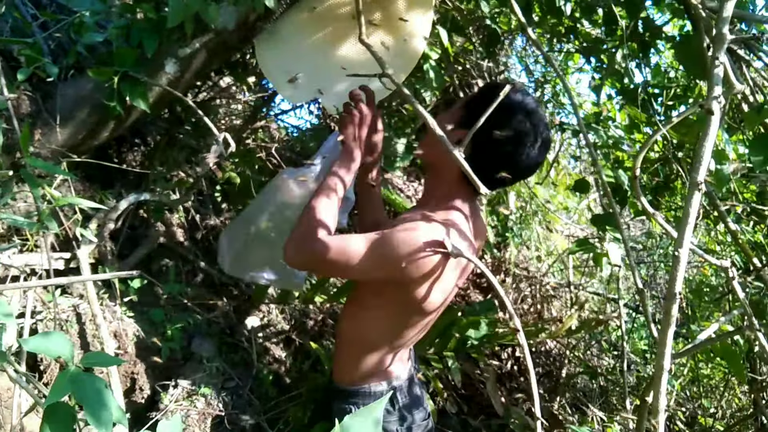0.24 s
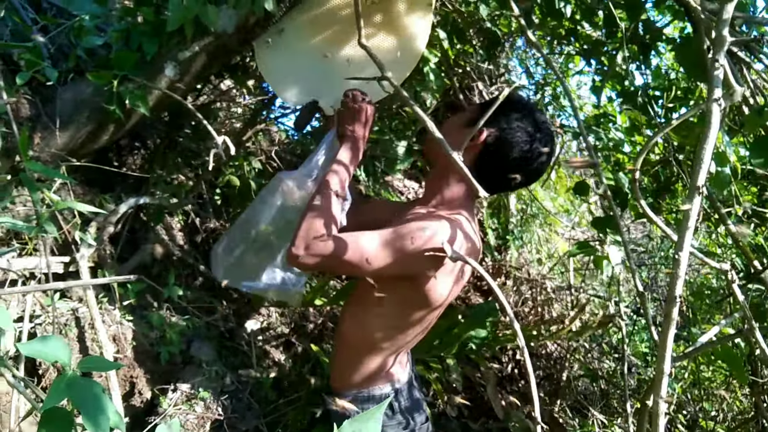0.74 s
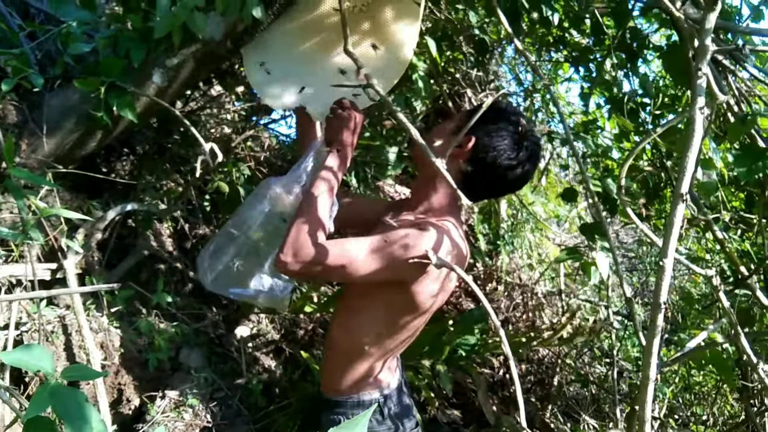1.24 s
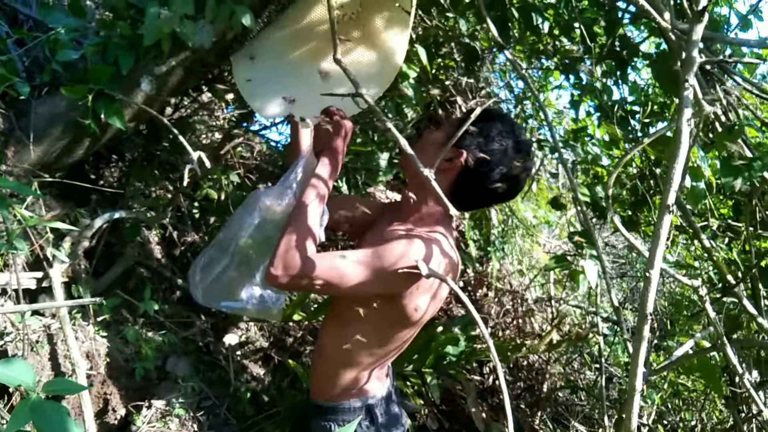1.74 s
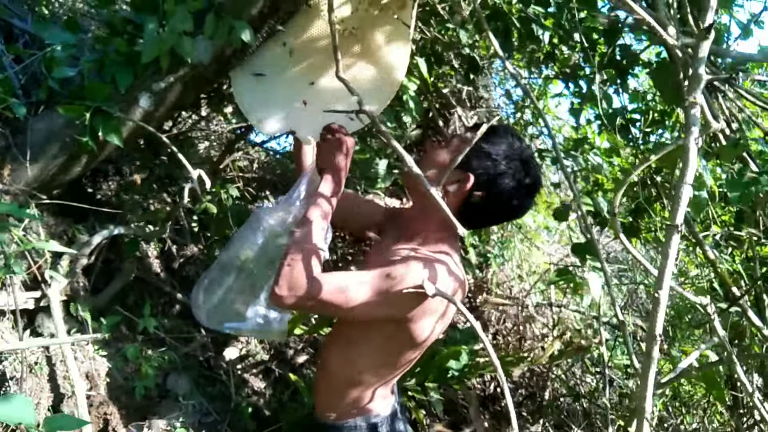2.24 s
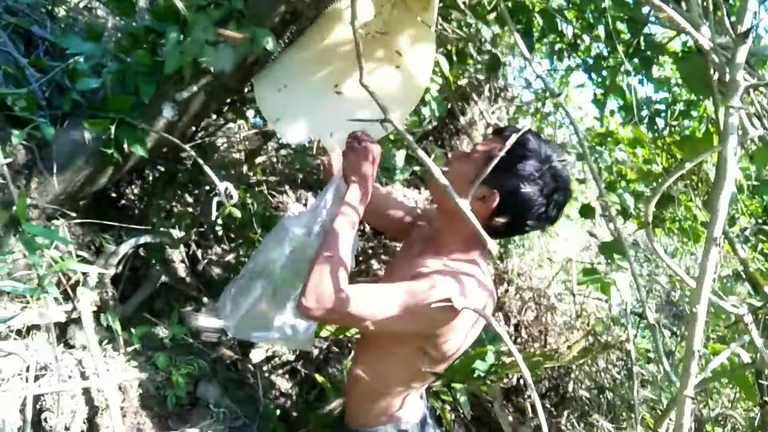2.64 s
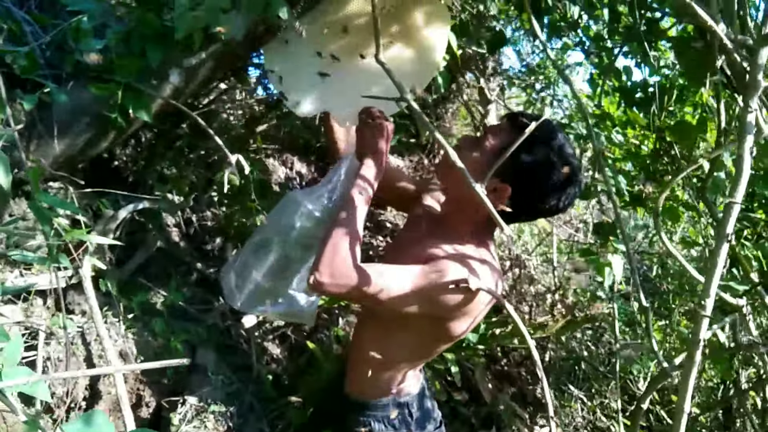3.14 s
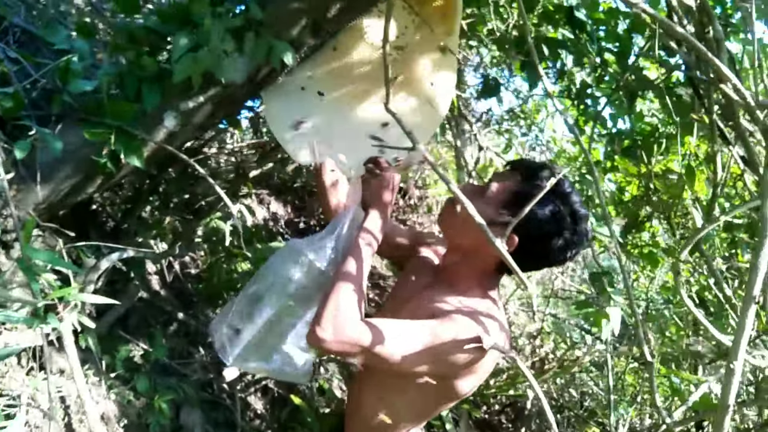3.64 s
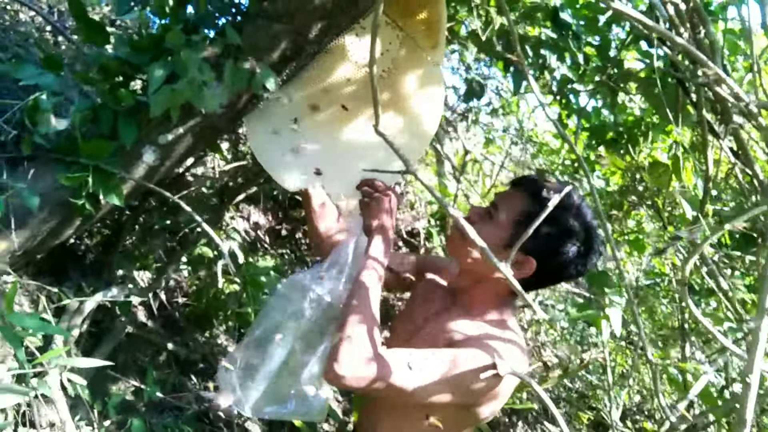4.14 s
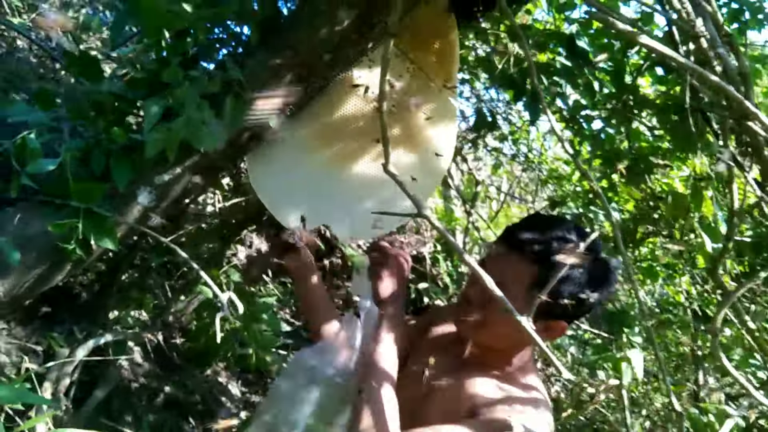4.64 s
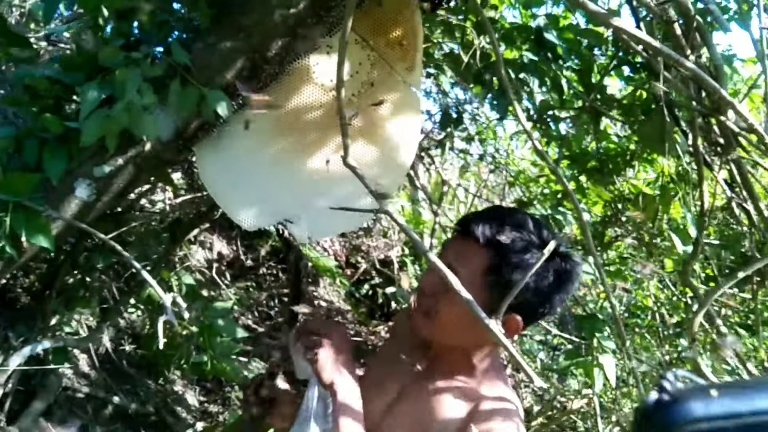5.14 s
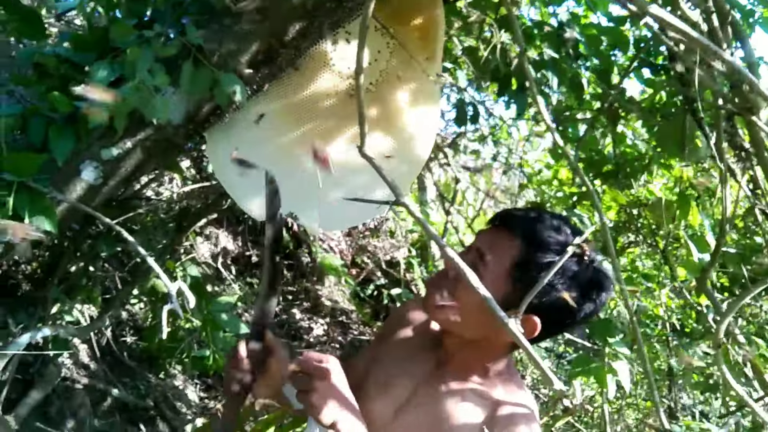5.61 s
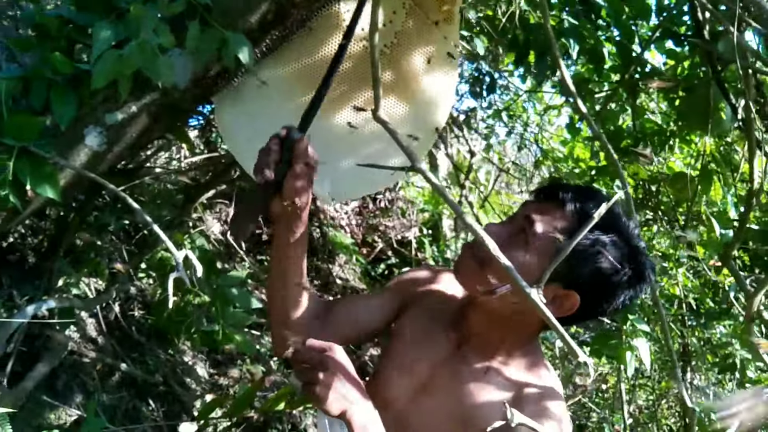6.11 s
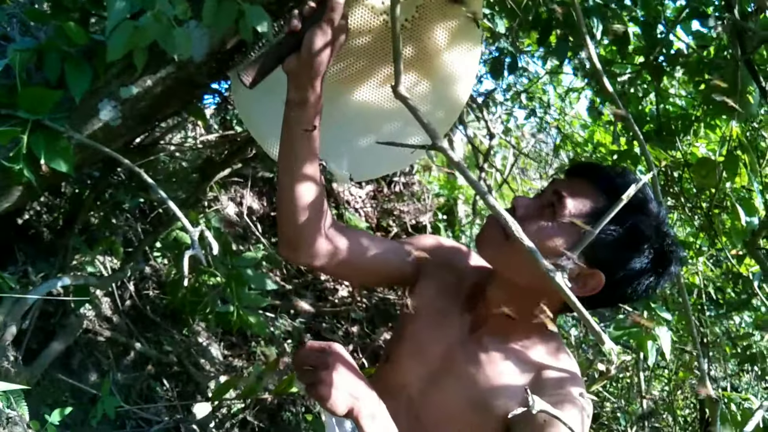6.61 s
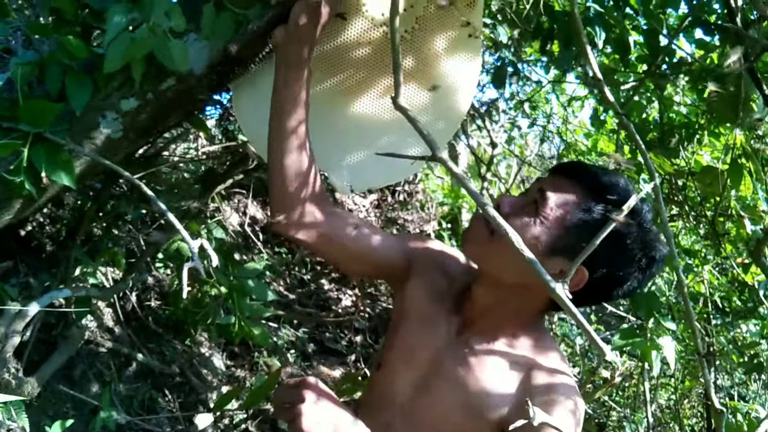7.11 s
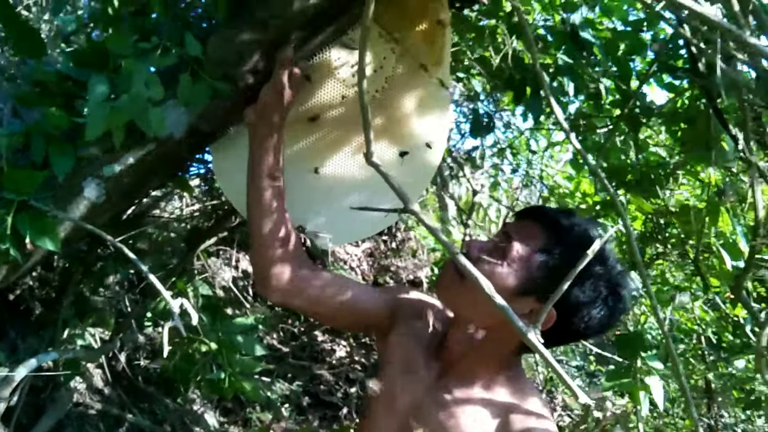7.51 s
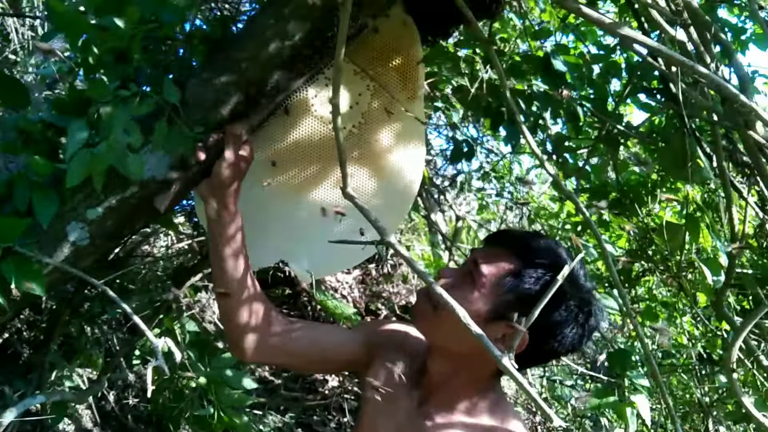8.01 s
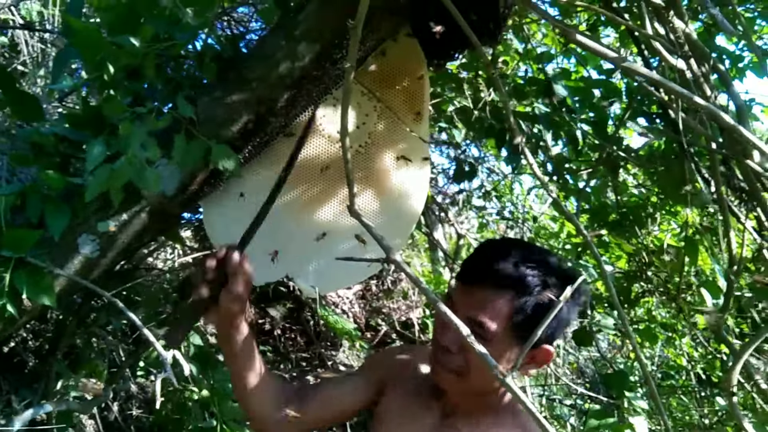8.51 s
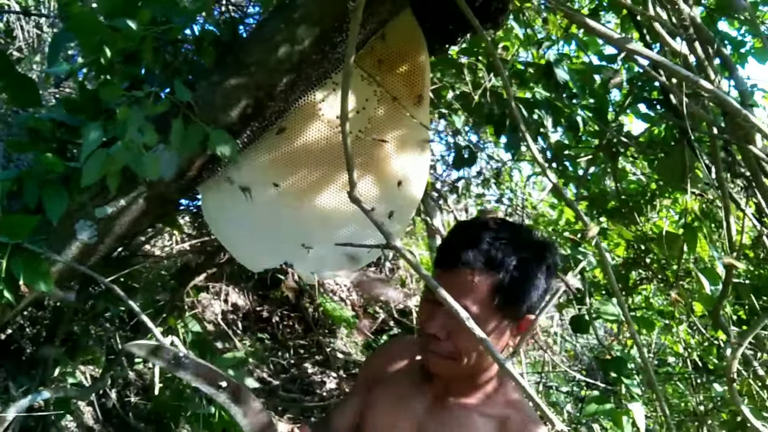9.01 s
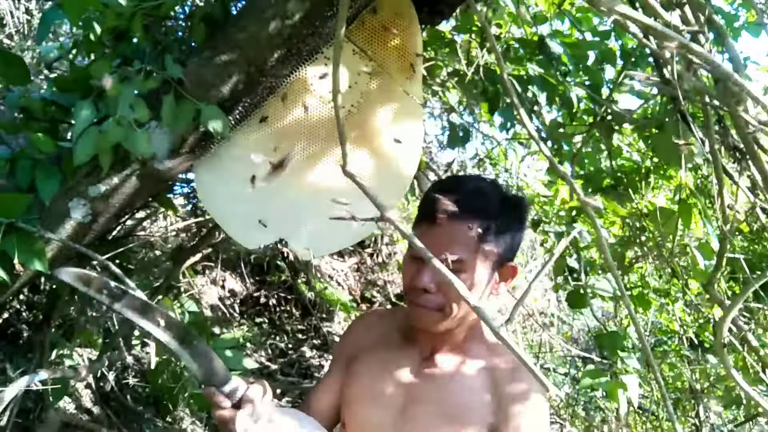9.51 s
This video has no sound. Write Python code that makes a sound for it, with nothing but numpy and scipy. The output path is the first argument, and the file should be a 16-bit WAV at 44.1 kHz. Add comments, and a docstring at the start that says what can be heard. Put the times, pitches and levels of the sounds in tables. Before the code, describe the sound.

A swarm of wild bees drones steadily outdoors, a plastic bag crinkles and snaps midway, then one bee zooms past the microphone amid crunching leaves.

```python
"""A cloud of wild bees drones around a comb under a tree, swelling as it is disturbed; single bees swing nearer.
The bees are looped wing strokes and summed harmonics; short treble buzzes and stirring leaves are resonated noise.
A plastic bag crinkles and snaps: clumps of ringing clicks, and short bursts of noise.
Near the end one bee shoots past the microphone: sweeping harmonics, wing wash thumping on the port,
and dry leaves crunch, built like the bag."""
import sys
import numpy as np
from scipy import signal
from scipy.fft import rfft, irfft, next_fast_len
from scipy.io import wavfile
from scipy.ndimage import uniform_filter1d, map_coordinates

SR = 44100
rng = np.random.default_rng(int(sys.argv[2]) if len(sys.argv) > 2 else 0)


def persist_wave(psi):
    """Save psi, clipped to +-1, as 16-bit WAV."""
    counts = np.round(np.clip(psi, -1, 1) * 32767).astype(np.int16)
    wavfile.write(sys.argv[1], SR, np.atleast_2d(counts).T)


N = 430416
TIME = np.arange(N) / SR
CUTOFF_HZ = 15650

# swarm before and after the close bee: (time [s], nominal hum level [dB], nominal wing rasp level [dB])
SWARM = [(0.0, -38.5, -53), (0.2, -42, -49), (0.79, -47, -57), (1.07, -39.5, -50), (1.42, -42.5, -46.5),
         (1.57, -41, -54.5), (2.22, -42, -52), (2.27, -46, -44), (2.42, -41, -45), (2.62, -43, -47.5),
         (3.1, -41, -47), (3.95, -39.5, -44), (4.44, -38.5, -42.5), (5.21, -41.5, -43), (6.01, -35, -40),
         (6.38, -40.5, -41), (8.67, -40.5, -46), (8.95, -38.5, -45.5)]
SWARM_SETTLING = [(9.3, -41.5, -43), (9.606, -41.5, -44.5), (9.76, -51, -45.5)]
# brief dips of the hum: (time [s], depth in nominal hum level [dB])
LULLS = [(0.45, 8), (0.86, 3), (1.49, 8), (2.34, 5), (2.72, 7), (2.98, 6), (6.48, 7), (6.73, 1), (7.27, 4),
         (7.62, 5), (7.96, 4), (8.55, 2)]
LULL_HALF_S = 0.034
# body tone of the wingbeat, and rasp of its upper harmonics: (frequency [Hz], relative level [dB])
HUM_COLOUR = [(50, -32), (80, -5), (110, -7.5), (150, 2.5), (200, -1.5), (300, 8.5), (420, -0.7),
              (520, -11), (700, -21)]
RASP_COLOUR = [(380, -7.5), (520, 0.5), (620, 2), (850, 1.3), (1050, -2), (1400, 0.5), (1650, -13.5),
               (2000, -20), (2400, -42)]
# slow beaters: level at the usual hum, dB per dB of hum
USUAL_HUM_DB, SLOW_DB, SLOW_DB_PER_HUM_DB = -40, -44, 1.24
# spectral patchiness of the rasp: spread at the usual rasp, and its fall per dB of rasp
USUAL_RASP_DB, PATCHY_DB, PATCHY_FALL_DB_PER_DB = -44, 3.7, 0.46
# strays between swarm and microphone, heard as separate tones: (frequency [Hz], relative level [dB])
STRAY_COLOUR = [(180, -8), (400, -1), (620, 1), (850, 1.5), (1100, -2.5), (1400, 1.5), (1650, -14),
                (2100, -30), (2800, -45)]
STRAY_RE_RASP_DB = -7
# faint wing sizzle, in two stretches of time: (time [s], nominal lower treble [dB], nominal upper treble [dB])
FIZZ = [
    [(0.0, -54, -47), (0.05, -66, -62), (0.3, -66, -58.5), (0.6, -75, -64), (1.0, -77, -62),
     (1.12, -64, -63), (1.42, -66, -62), (1.76, -74, -62), (2.02, -64, -59), (2.14, -74, -62),
     (2.4, -64, -59.5), (2.72, -66, -60), (2.88, -72, -62.5), (3.25, -69, -62.5), (3.4, -62, -61),
     (3.55, -66, -59), (3.68, -55, -50)],
    [(4.85, -53, -52), (4.98, -56, -52), (5.45, -55, -48.5), (5.94, -53.5, -49), (6.5, -55, -53),
     (6.8, -56, -54), (7.1, -62, -56), (7.42, -57, -53), (7.6, -59, -56), (7.92, -55.5, -52.5),
     (8.05, -59, -56), (8.21, -57.5, -57), (8.5, -61, -53), (8.81, -66, -53), (8.97, -52.5, -49)],
]
# its spectrum: (frequency [Hz], relative level [dB])
FIZZ_COLOUR = [(1400, -1), (2100, 3.5), (2800, 5.7), (3600, -2), (4400, -4.5), (5300, 3), (6100, -3.5),
               (7400, 2.5), (9600, -7), (10600, 4.5), (11200, 1.5), (12000, 3), (15500, 4.5)]
TREBLE_SPLIT_HZ = 4600
# soft bed of outdoor air: (frequency [Hz], relative level [dB])
AIR_COLOUR = [(25, 0), (60, 14), (150, 25), (500, 4), (2000, -9), (4000, -9), (7500, -9), (10000, -9),
              (12000, -8), (15000, -9)]
AIR_DB = -60.5
# bees that swing nearer: (time [s], mean wingbeat [Hz], fundamental [dB], octave [dB], overtones in total [dB])
PASSES = [(0.02, 140.3, -44.5, -46, -54), (0.14, 193, -49, -50, -49.5), (0.53, 207, -52, -51.5, -58.5),
          (0.57, 124, -58, -48.5, -58), (0.73, 192, -51, -49, -58.5), (0.82, 142, -60, -50.5, -54),
          (0.94, 199, -56, -50.5, -54), (1.05, 107.1, -46, -44, -53), (1.13, 194, -44.5, -56, -53),
          (1.23, 150, -56, -48, -49), (1.26, 213, -55, -45.5, -55), (1.35, 210.3, -44, -47, -50),
          (1.43, 213, -55, -48.5, -54), (1.589, 196.3, -43.5, -60, -59), (1.64, 143, -54, -45, -49),
          (1.73, 198, -50, -48, -55), (1.89, 142, -56, -48, -51), (2.02, 145, -44, -60, -60),
          (2.06, 112.2, -43.5, -50, -56), (2.11, 127, -50, -46, -57), (2.31, 212, -53, -46, -48),
          (2.438, 183.8, -39, -60, -50), (2.5, 143, -52, -50, -52), (2.59, 208, -54, -48, -54),
          (2.79, 226, -47, -51, -54), (3.03, 136, -50, -48, -55), (3.12, 198.5, -44, -65, -58),
          (3.27, 138, -45.5, -42, -50), (3.36, 205, -43, -51, -53), (3.43, 150, -53, -46, -50),
          (3.511, 130.2, -42.5, -59, -54), (3.6, 117, -48, -45, -51), (3.65, 193.8, -45, -47, -48),
          (3.73, 140, -53, -45, -52), (3.74, 217, -57, -44, -52), (4.05, 140, -46, -54, -52),
          (4.22, 214, -46, -48, -49), (4.37, 207, -41.5, -42.5, -50), (4.41, 143, -47, -46, -49),
          (4.55, 195.7, -37, -55, -51), (4.71, 184, -44, -43, -47), (4.81, 107.8, -44, -52, -55),
          (4.85, 197, -44.5, -47, -50), (4.955, 142, -51, -46, -47), (5.161, 205.9, -46, -47, -50),
          (5.22, 197, -51, -46, -53), (5.43, 206, -38, -49, -48), (5.51, 202, -51, -44, -49),
          (5.63, 194, -41, -51, -50), (5.7, 110.5, -41, -48, -48), (5.73, 199, -49, -43, -48),
          (5.93, 197, -50, -45, -50), (6.02, 203, -43, -42.5, -48), (6.16, 115, -39, -43, -46),
          (6.21, 140, -51, -43, -49), (6.308, 202.7, -43, -60, -52), (6.55, 148, -53, -46, -49),
          (6.69, 213, -50, -47, -47), (6.81, 215, -45, -48, -51), (6.94, 148, -55, -44, -49),
          (7.05, 140, -55, -45, -51), (7.12, 159, -40.5, -50, -53), (7.4, 130, -43, -54, -56),
          (7.42, 207, -40.5, -53, -56), (7.46, 202, -50, -46, -54), (7.66, 143, -53, -44, -52),
          (7.702, 182.3, -42.5, -52, -55), (7.84, 198.7, -43, -48, -51), (7.89, 143, -54, -46, -52),
          (8.115, 140.6, -41.5, -37.5, -52), (8.25, 145, -47, -53, -47), (8.32, 210, -44, -54, -55),
          (8.42, 153, -55, -44, -53), (8.425, 205, -53, -45, -53), (8.47, 194, -48, -50, -50),
          (8.71, 211, -43.5, -49, -54)]
# short narrow treble buzzes: (time [s], nominal level [dB], centre frequency [Hz], half length [s])
TREBLE_BUZZES = [(0.273, -52, 5250, 0.028), (1.988, -49.5, 5480, .02), (2, -51.5, 7940, 0.024),
                 (2.51, -45.5, 7340, 0.022), (3.09, -57.5, 2650, 0.023), (3.64, -53, 7250, .025),
                 (4.121, -46, 7250, .025), (5.641, -48, 7000, 0.039), (7.984, -48.5, 7550, .014),
                 (8.123, -60, 4800, .025), (8.4, -53, 7300, 0.047), (8.634, -55, 7160, 0.048),
                 (9.025, -39.5, 4900, 0.049)]
# soft foliage rustles: (time [s], nominal level [dB], brightest [Hz], width of each resonance [Hz], t60 [s])
RUSTLES = [(0.287, -42.5, 10500, 3000, 0.1), (0.885, -47, 10000, 5000, 0.17), (1.11, -55, 12000, 2500, .15),
           (1.5, -56, 10700, 1200, .3), (2.056, -46, 7400, 6000, 0.073), (2.057, -56, 2600, 1200, .07),
           (2.26, -57, 13200, 1200, .25), (2.53, -52.5, 12800, 2000, .14), (4.844, -42, 5470, 7000, 0.09),
           (5.041, -43, 7000, 7000, 0.2), (5.072, -39.5, 7500, 4000, 0.05),
           (5.831, -38.5, 8600, 9000, 0.11), (5.902, -38, 8650, 9000, 0.15), (7.276, -45, 8800, 9000, 0.25),
           (7.485, -44.5, 11500, 8000, 0.07), (7.66, -49, 6500, 7000, .15),
           (7.864, -45.5, 5000, 3500, 0.25), (7.884, -45, 8500, 4500, 0.15), (8.306, -48, 5000, 1500, 0.08),
           (8.342, -50, 7500, 1500, 0.1)]
# squeezes of the bag: (start [s], length [s], crinkle level [dB])
BAG_SQUEEZES = [(3.712, 0.18, -36.5), (3.93, 0.04, -44.5), (4.09, .05, -44), (4.14, 0.1, -35.5),
                (4.24, 0.14, -37), (4.36, 0.13, -35.5), (4.5, 0.08, -38), (4.62, 0.11, -41)]
# presses on the dry leaves: (start [s], length [s], crinkle level [dB])
LEAF_PRESSES = [(4.37, 0.072, -33.5), (9.06, 0.31, -34), (9.31, 0.04, -28.5), (9.39, 0.1, -36),
                (9.46, .07, -30), (9.57, 0.062, -36), (9.68, .08, -43.5)]
# spectra of their crinkle: (frequency [Hz], relative level [dB])
BAG_COLOUR = [(1200, -10.5), (2200, -18), (3400, -13), (5600, -9), (7600, -2), (9400, -7.5), (12000, -13),
              (15500, -14)]
LEAF_COLOUR = [(600, -4), (1200, -2), (2200, -4), (3500, -0.5), (5000, 1), (7500, 5), (10000, -2.5),
               (12500, -16), (15500, -20)]
# creases and twigs that snap: (time [s], nominal level [dB], brightest [Hz], t60 of the main fade [s])
SNAPS = [(3.7115, -18.5, 8400, 0.077), (3.753, -29, 8000, .04), (3.774, -26, 7300, 0.04),
         (3.818, -29, 7800, .06), (3.848, -28, 7500, .03), (3.894, -25.5, 8300, 0.065),
         (3.901, -27, 8800, .04), (3.959, -27.5, 7200, .02), (4.147, -33, 7600, .05),
         (4.158, -28.5, 7800, .07), (4.263, -31, 5500, .05), (4.318, -29, 7400, 0.087),
         (4.3938, -16.5, 5030, .05), (4.408, -23, 6300, 0.098), (4.4645, -19.5, 7300, 0.04),
         (4.4995, -27, 7500, .02), (4.534, -30, 6500, .04), (4.5914, -8.3, 7700, 0.046),
         (4.698, -25, 10000, 0.06), (9.163, -21, 4970, 0.056), (9.174, -22.5, 6900, 0.05),
         (9.276, -27, 7400, 0.04), (9.334, -27, 7000, 0.076), (9.342, -27, 3000, .04),
         (9.349, -23.5, 5500, 0.06), (9.356, -25, 8300, .04), (9.385, -26, 2600, .05),
         (9.412, -31, 6800, .04), (9.435, -30, 7000, .03), (9.467, -28, 6000, .03), (9.486, -27, 5000, .03),
         (9.505, -27, 4500, .03), (9.525, -26, 7000, .04), (9.532, -24, 6500, 0.035),
         (9.548, -18, 6500, 0.04), (9.55, -24, 2600, .03), (9.554, -18, 6500, .03), (9.614, -29, 8000, .03),
         (9.621, -25.5, 6530, 0.054), (9.741, -30.5, 5500, 0.04)]
CRACK_DB, CRACK_DB_PER_SNAP_DB = 11.5, 1.5
# the bee at the microphone speeds up its wingbeat as it darts by
FLYBY_FROM_S, FLYBY_TO_S = 8.93, 9.32
CRUISE_HZ, DART_HZ, DART_S, DART_RISE_S = 199.6, 222.5, 9.076, 0.027
# its pitch sinks as it crosses the microphone, by this fraction either way
CLOSEST_S, DOPPLER_FRACTION, CROSSING_S = 9.126, 0.011, 0.011
# lobes of its wing sound: fundamental, octave, overtones, stroke edge: (time [s], peak level [dB], half width [s])
LOBES = [(9.114, -6.5, 0.018), (9.131, -13, 0.015), (9.116, -22.3, 0.024), (9.106, -32, 0.032)]
# its fundamental cancels edge-on to the wings
EDGE_ON_S, EDGE_ON_WIDTH_S = 9.155, 0.039
# its overtones: (frequency [Hz], relative level [dB])
OVERTONES = [(660, 0.5), (880, 4), (1100, -8), (1500, -11.5), (2200, -16), (3000, -18.5), (5000, -16)]
# turbulent wash on the port, and air churned up by the wings: (time [s], peak level [dB], half width [s])
WASH = (9.14, -18, .011)
CHURN = (9.132, -25, 0.011)
# spectrum of the wash: (frequency [Hz], relative level [dB])
WASH_COLOUR = [(25, -21), (60, -12), (100, 0), (135, 9), (190, 3), (600, -7.5), (1200, -33), (3000, -45)]


def from_db(db):
    """Decibels to gain."""
    return np.exp(np.asarray(db) * (np.log(10) / 20))


def rms_one(x):
    """Scale to an rms of 1."""
    return x / np.sqrt(np.mean(x ** 2) + 1e-20)


def in_time(rows):
    """Columns of a curve, interpolated at every sample."""
    s, *columns = np.transpose(rows)
    return [np.interp(TIME, s, c) for c in columns]


def gain_at(points, hz):
    """Gain of a spectrum, joined on a log-frequency axis."""
    f, db = np.transpose(points)
    return from_db(np.interp(np.log(hz + 1e-3), np.log(f), db))


def colour(x, points):
    """Filter by a spectrum that falls away beyond both ends; rms 1."""
    size = next_fast_len(N + 4096)
    hz = np.arange(size // 2 + 1) * SR / size
    ends = np.minimum(hz / points[0][0], 1) ** 2 / np.maximum(hz / points[-1][0], 1) ** 2
    return rms_one(irfft(rfft(x, size) * gain_at(points, hz) * ends, size)[:N])


def drift(rate_hz):
    """Random curve of rms 1: noise through two equal poles at rate_hz."""
    step = 100  # samples between the points of the curve
    r = np.exp(-2 * np.pi * step * rate_hz / SR)
    noise = rng.standard_normal(N // step + 1002)
    slow = signal.lfilter([1], [1, -2 * r, r * r], noise)[1000:]  # drop the filter's onset
    return np.interp(TIME, np.arange(len(slow)) * step / SR, rms_one(slow))


def even(x, size=6000):
    """Level out the power averaged over size samples."""
    return x / np.sqrt(np.abs(uniform_filter1d(x ** 2, size)) + 1e-9)


def resonate(x, hz, width_hz):
    """One resonance, its centre held at or below the cutoff."""
    r = np.exp(-np.pi * width_hz / SR)
    centre = 2 * np.pi * min(hz, CUTOFF_HZ) / SR
    return signal.lfilter([1, 0, -1], [1, -2 * r * np.cos(centre), r * r], x)


def around(s, half_s):
    """Samples near a moment, and a bell-shaped swell over them."""
    near = slice(max(0, int((s - 4 * half_s) * SR)), int((s + 4 * half_s) * SR))
    return near, np.exp(-.5 * ((TIME[near] - s) / half_s) ** 2)


def fly_past(s, db, half_s, t):
    """Gain of a near source that falls with the square of its distance along a straight path."""
    return from_db(db) / (1 + ((t - s) / half_s) ** 2)


def patchy(x, spread_db, width_hz, hold_s, size=1024):
    """Narrow stretches of the spectrum flicker up and fade at random."""
    hz, s, spectrum = signal.stft(x, SR, nperseg=size)
    chance = rng.standard_normal((512, 1024))
    grid = np.meshgrid(hz / width_hz, s / hold_s, indexing="ij")
    field = rms_one(map_coordinates(chance, grid, order=2, mode="wrap"))
    depth_db = np.interp(s, TIME, spread_db * np.ones(N))
    gain = from_db(depth_db * np.minimum(field, 2.2))
    return signal.istft(spectrum * gain, SR, nperseg=size)[1][:N]


def wing_stroke(size=4096, count=76):
    """One cycle of a bee's pressure wave, with random harmonic levels and phases around a falling slope."""
    k = np.arange(1, count + 1)
    levels = from_db(rng.normal(0, 1.4, count)) / np.minimum(k, 10) ** 0.87
    partials = levels * np.exp(1j * rng.normal(0, 1.0, count))
    return irfft(np.append(0, partials), size)


def bees(beat_hz, spread, wander, tremble, range_db, range_per_s, count):
    """Many bees, each with its own wingbeat, which bends as it turns, and its own changing distance."""
    out, flutter = np.zeros(N), drift(25.05)
    for offset in np.linspace(-1, 1, count):
        stroke, course = wing_stroke(), drift(3.5)
        trembling = tremble * np.roll(flutter, rng.integers(N))
        hz = beat_hz * np.exp(spread * offset + wander * course + trembling)
        cycles = np.cumsum(hz) / SR + rng.random()
        place = (cycles * len(stroke)).astype(int) % len(stroke)
        out += stroke[place] * from_db(range_db * np.minimum(drift(range_per_s), 2))
    return rms_one(out)


def treble(x, lower_db=0.1, upper_db=0.1, surge_db=0.7):
    """Sizzle split into lower and upper treble, each at its own level."""
    lower, upper = [even(signal.sosfilt(signal.butter(6, TREBLE_SPLIT_HZ, side, fs=SR, output="sos"), x))
                    for side in ("low", "high")]
    lower_level_db, upper_level_db = in_time(np.vstack(FIZZ))
    # opposite signs let the halves join without a notch
    joined = from_db(lower_level_db + lower_db) * lower - from_db(upper_level_db + upper_db) * upper
    return from_db(surge_db * drift(5.0)) * joined


def swarm(slow_surge_db=1.5, fast_surge_db=0.5):
    """Slow and fast beaters hum; upper harmonics merge into rasp and flickering sizzle; strays stand out."""
    hum_db, rasp_db = in_time(np.vstack([SWARM, SWARM_SETTLING]))
    for s, depth_db in LULLS:
        near, dip = around(s, LULL_HALF_S)
        hum_db[near] -= depth_db * dip
    slow_db = SLOW_DB + SLOW_DB_PER_HUM_DB * (hum_db - USUAL_HUM_DB) + slow_surge_db * drift(6.1)
    fast_db = hum_db + fast_surge_db * drift(5.3)
    # few bees buzz in patches, many fill the spectrum
    spread_db = np.maximum(PATCHY_DB - PATCHY_FALL_DB_PER_DB * (rasp_db - USUAL_RASP_DB), 0)

    slow = bees(beat_hz=129.83, spread=.18, wander=.06, tremble=.009, range_db=3.5, range_per_s=7.1, count=11)
    fast = bees(beat_hz=203.25, spread=.08, wander=.05, tremble=.007, range_db=5, range_per_s=5.9, count=10)
    strays = bees(beat_hz=206, spread=.05, wander=.04, tremble=.003, range_db=8, range_per_s=2.5, count=4)
    everyone = fast + 1.2 * slow

    slow_hum = even(patchy(colour(slow, HUM_COLOUR), spread_db=2.5, width_hz=86, hold_s=.05))
    fast_hum = even(patchy(colour(fast, HUM_COLOUR), spread_db=3.0, width_hz=138, hold_s=.05))
    rasp = even(patchy(colour(everyone, RASP_COLOUR), spread_db, width_hz=138.5, hold_s=.05))
    fizz = patchy(colour(everyone, FIZZ_COLOUR), spread_db=7.7, width_hz=115, hold_s=.042)
    hum = from_db(slow_db) * slow_hum + from_db(fast_db - 4.5) * fast_hum
    stray_tones = from_db(rasp_db + STRAY_RE_RASP_DB) * even(colour(strays, STRAY_COLOUR), size=12000)
    return hum + from_db(rasp_db - 0.6) * rasp + stray_tones + treble(fizz)


def outdoor_air():
    """Steady coloured noise."""
    return from_db(AIR_DB) * colour(rng.standard_normal(N), AIR_COLOUR)


def near_bees(half_s=0.046, reach_s=.085, doppler=0.025, waver=0.00803, flicker_db=4, count=16):
    """A bee swells out of the cloud and fades, its wavering pitch sinking as it goes by."""
    out, wavering = np.zeros(N), waver * drift(12)
    orders = np.arange(3, count)
    for s, hz, first_db, octave_db, overtones_db in PASSES:
        near, in_reach = around(s, reach_s)
        swell = in_reach * fly_past(s, 0, half_s, TIME[near])
        sinking = doppler * np.tanh((TIME[near] - s) / (2 * half_s))
        phase = 2 * np.pi * np.cumsum(hz * (1 + wavering[near] - sinking)) / SR
        upper = gain_at(STRAY_COLOUR, orders * hz) / orders * from_db(rng.normal(0, flicker_db, len(orders)))
        upper *= from_db(overtones_db) / np.linalg.norm(upper)
        for k, gain in enumerate([from_db(first_db), from_db(octave_db), *upper], 1):
            out[near] += np.sqrt(2) * gain * swell * np.sin(k * phase + rng.uniform(0, 2 * np.pi))
    return out


def treble_buzzes(width_hz=650, level_db=-2.2):
    """Short bursts of noise, pulsing at a wingbeat rate, in one narrow, flickering band each."""
    out = np.zeros(N)
    beats_hz = rng.uniform(105, 215, len(TREBLE_BUZZES))
    for (s, db, hz, half_s), beat_hz in zip(TREBLE_BUZZES, beats_hz):
        near, swell = around(s, half_s)
        beating = (3.6 + np.cos(2 * np.pi * beat_hz * TIME[near])) ** 2
        pulses = rng.standard_normal(len(swell)) * beating
        buzz = rms_one(resonate(resonate(pulses, hz, width_hz), hz, width_hz))
        out[near] += from_db(db + level_db) * swell * buzz
    return patchy(out + 1e-18, spread_db=4.5, width_hz=170, hold_s=.025, size=512)


def rustles(attack_s=0.0035, clump_db=2.5, scatter_db=-17, scatter_t60_s=0.79, size=16000):
    """Leaves brush one another in a soft, uneven run of contacts, each in a band of its own."""
    out, t = np.zeros(N + size), np.arange(size) / SR
    for s, db, hz, width_hz, t60_s in RUSTLES:
        brush = rms_one(resonate(resonate(rng.standard_normal(size), hz, width_hz), hz, width_hz))
        fade = from_db(-60 * t / t60_s) + from_db(scatter_db - 60 * t / scatter_t60_s)
        start = int(s * SR)
        out[start:start + size] += from_db(db) * brush * np.minimum(t / attack_s, 1) * fade
    clumped = out[:N] * from_db(clump_db * drift(90))
    uneven = patchy(clumped, spread_db=4.5, width_hz=330, hold_s=.04, size=256)
    return signal.sosfilt(signal.butter(2, 1800, "high", fs=SR, output="sos"), uneven + 1e-18)


def snaps(width=0.55, burst_db=2, burst_t60_s=0.0064, scatter_db=-21, scatter_t60_s=0.58, size=16000):
    """A sharp crack, which leads in the hardest snaps, a flurry of sheet or twig, and faint thicket scatter."""
    out, t = np.zeros(N + size), np.arange(size) / SR
    for s, db, hz, t60_s in SNAPS:
        crack = resonate(signal.unit_impulse(size) + 1e-18, hz, width * hz)
        crack_gain = from_db(CRACK_DB + CRACK_DB_PER_SNAP_DB * db) / np.abs(crack).max()
        flurry = rms_one(resonate(rng.standard_normal(size), hz, width * hz))
        burst = from_db(burst_db - 60 * t / burst_t60_s)
        scatter = from_db(scatter_db - 60 * t / scatter_t60_s)
        fade = burst + from_db(-60 * t / t60_s) + scatter
        start = int(s * SR)
        out[start:start + size] += from_db(db - 6.0) * flurry * fade + crack_gain * crack
    return signal.sosfilt(signal.butter(2, 1300, "high", fs=SR, output="sos"), out[:N] + 1e-18)


def crinkle(spectrum, per_s, size_db, clump_db, count=16):
    """Tiny creases buckle in clumps, each ringing a few cycles at one of count pitches; the colour shifts."""
    born = np.flatnonzero(rng.random(N) < per_s / SR * from_db(clump_db * drift(20)))
    sizes = from_db(size_db * np.minimum(rng.exponential(1, len(born)), 4)) * rng.choice([-1, 1], len(born))
    dealt, out = rng.integers(0, count, len(born)), np.zeros(N)
    for k, hz in enumerate(np.geomspace(1200, 15000, count)):
        clicks = np.full(N, 1e-18)
        clicks[born] += sizes * (dealt == k)
        out += np.sqrt(hz) * resonate(clicks, hz, width_hz=0.32 * hz)
    mixed = rms_one(out) + .45 * rng.standard_normal(N)
    grains = patchy(mixed, spread_db=1.8, width_hz=350, hold_s=.025, size=256)
    return even(colour(grains, spectrum), size=3000)


def handling(rows, attack_s, release_db_per_s):
    """Each movement builds up, holds and dies away; the strongest one leads."""
    movements = []
    for s, length_s, db in rows:
        attack = np.clip((TIME - s) / attack_s, 0, 1)
        release_db = release_db_per_s * np.maximum(TIME - s - length_s, 0)
        movements.append(attack * from_db(db - release_db))
    return np.max(movements, axis=0)


def plastic_bag():
    """Squeezes buckle the sheet into bursts of crinkle."""
    squeeze = handling(BAG_SQUEEZES, attack_s=0.029, release_db_per_s=147)
    return squeeze * crinkle(BAG_COLOUR, per_s=2000, size_db=1.5, clump_db=4)


def dry_leaves():
    """Presses crunch the leaves with a denser crinkle."""
    press = handling(LEAF_PRESSES, attack_s=0.034, release_db_per_s=113)
    return press * crinkle(LEAF_COLOUR, per_s=2400, size_db=1.5, clump_db=4)


def flyby(hiss_db=-4.5, flicker_db=3.8, wobble=0.007, count=22):
    """Stroke edges click and hiss on approach; the fundamental leads, then octave and churn, then wash."""
    near = slice(int(FLYBY_FROM_S * SR), int(FLYBY_TO_S * SR))
    t = TIME[near]
    hz = CRUISE_HZ + (DART_HZ - CRUISE_HZ) * (1 + np.tanh((t - DART_S) / DART_RISE_S)) / 2
    sinking = DOPPLER_FRACTION * np.tanh((t - CLOSEST_S) / CROSSING_S)
    hz = hz * (1 - sinking + wobble * drift(60)[near])
    phase = 2 * np.pi * np.cumsum(hz) / SR

    first, octave, overtones, edge = [fly_past(*lobe, t) for lobe in LOBES]
    facing = np.tanh((EDGE_ON_S - t) / EDGE_ON_WIDTH_S)
    partials = []
    for k in range(3, count):
        gain = gain_at(OVERTONES, k * np.mean(hz)) * from_db(flicker_db * drift(40)[near])
        partials.append(gain * np.cos(k * phase + rng.normal(0, 0.5)))
    overtone_sound = even(sum(partials[:3]), size=1200)
    clicks = even(sum(partials[3:]), size=1200)
    beating = (2.6 + np.cos(phase)) ** 2
    hiss = rms_one(resonate(rng.standard_normal(len(t)), hz=5500, width_hz=7400) * beating)

    churn = colour(rng.standard_normal(N), [(300, 2), (750, 0), (1200, -10)])  # (Hz, dB)
    wash = even(colour(rng.standard_normal(N), WASH_COLOUR), size=700)
    out = fly_past(*WASH, TIME) * wash + fly_past(*CHURN, TIME) * churn
    out[near] -= np.sqrt(2) * (first * facing * np.cos(phase) + octave * np.cos(2 * phase))
    out[near] -= overtones * overtone_sound + edge * (clicks + from_db(hiss_db) * hiss)
    return out


def puff(s=9.141, db=-14, hz=112, half_s=0.0077):
    """The air pushed down by the passing bee gives the microphone one low, brief shove."""
    out = np.zeros(N)
    near, swell = around(s, half_s)
    out[near] = np.sqrt(2) * from_db(db) * swell * np.sin(2 * np.pi * hz * (TIME[near] - s))
    return out


def scene():
    """Bees, treble buzzes, handling noises and still outdoor air."""
    drone_and_buzzes = swarm() + near_bees() + treble_buzzes() + flyby() + puff()
    foliage_and_bag = rustles() + snaps() + plastic_bag() + dry_leaves()
    return (drone_and_buzzes + foliage_and_bag + outdoor_air())[None]


def record(dry):
    """Steep low-pass at the cutoff, then clipping at full scale."""
    low_pass = signal.ellip(10, .2, 80, CUTOFF_HZ, fs=SR, output="sos")
    return np.clip(signal.sosfilt(low_pass, dry), -1, 1)


dry = scene()
out = record(dry)
persist_wave(out)
```